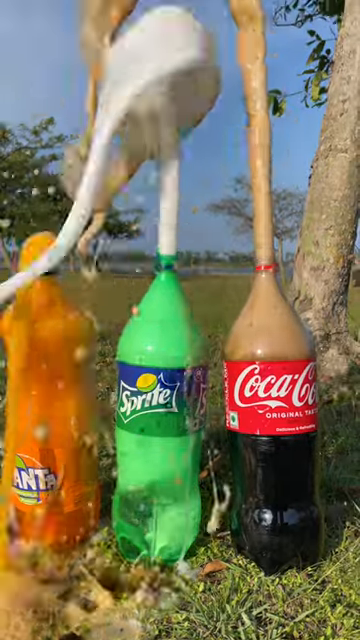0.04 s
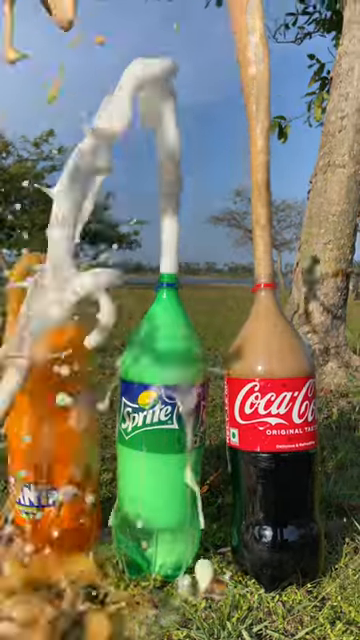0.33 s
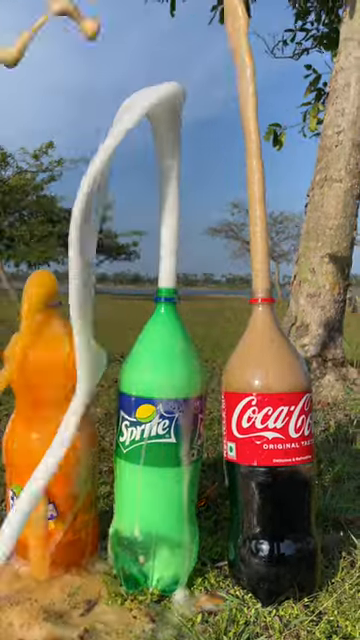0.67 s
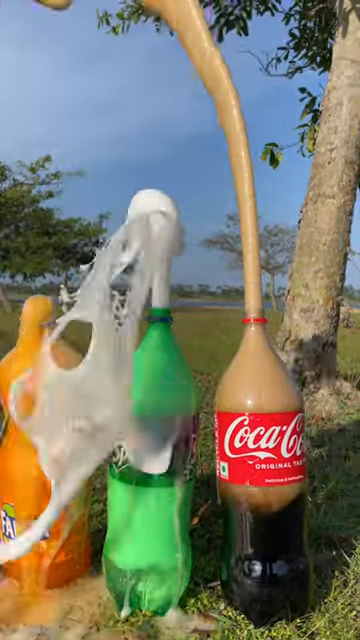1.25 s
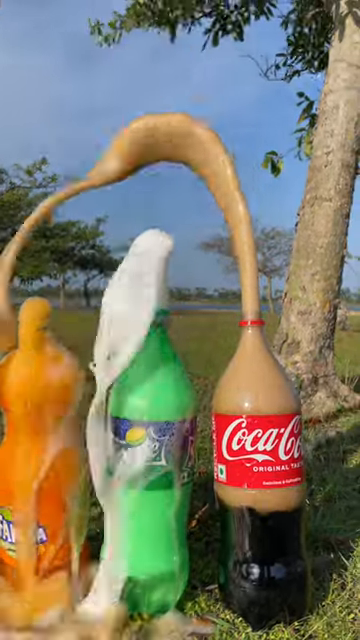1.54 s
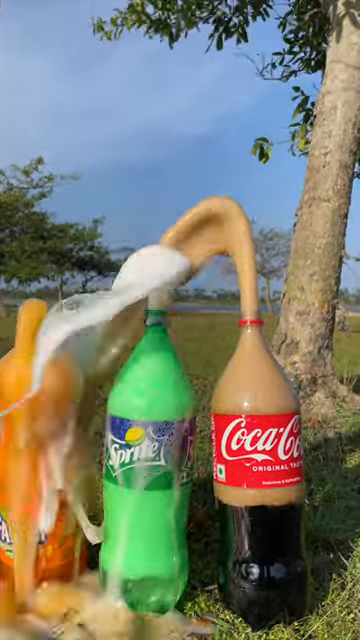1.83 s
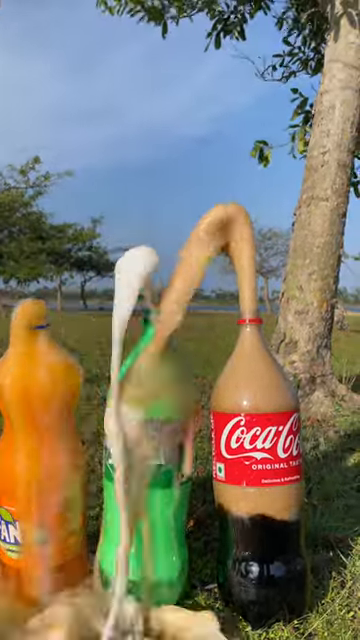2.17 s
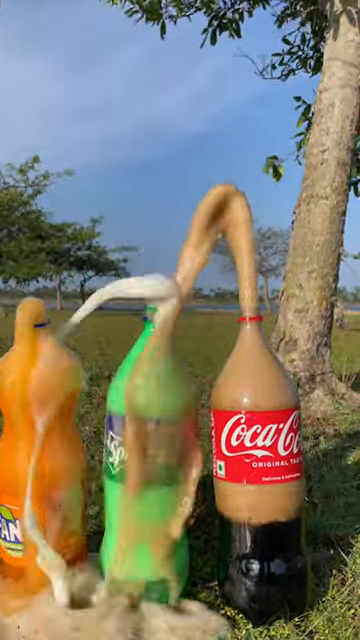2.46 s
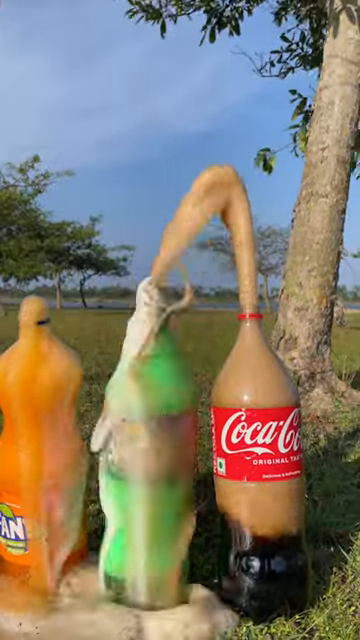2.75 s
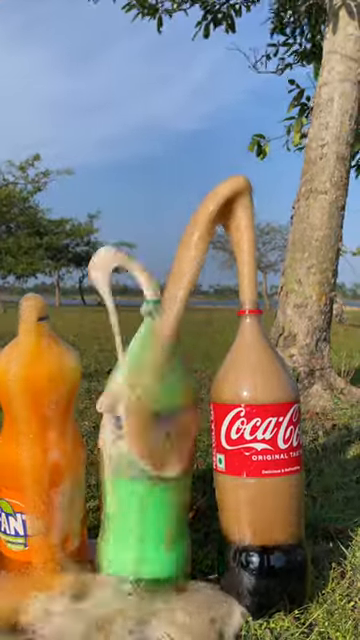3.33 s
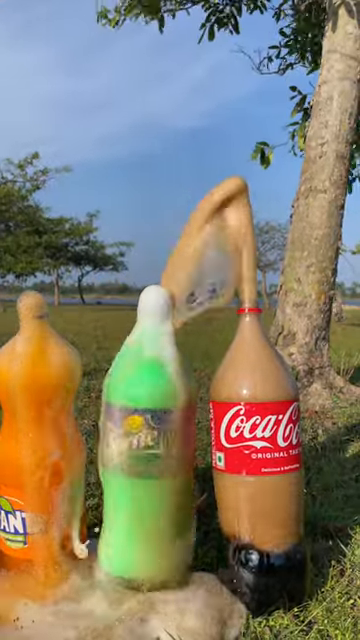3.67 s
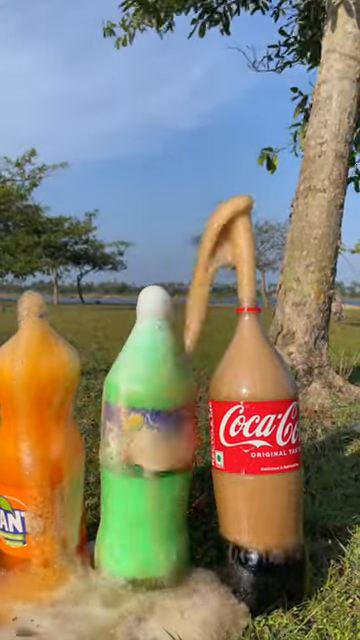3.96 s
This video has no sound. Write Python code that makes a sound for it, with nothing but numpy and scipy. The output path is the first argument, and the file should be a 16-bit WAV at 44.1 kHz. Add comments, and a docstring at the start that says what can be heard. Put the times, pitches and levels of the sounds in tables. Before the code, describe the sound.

Erupting soda foam slaps and spatters on a lawn, then drips and fizzes in a breeze.

```python
"""Foam from three erupting soda bottles slaps and spatters on a lawn, with a patter of spray.
After 1.7 s the jets sink: a neck hisses briefly, and foam drips, dribbles and fizzes in its puddle.
Heavy blobs thud throughout. A breeze rumbles and flutters on the close two-port microphone."""
import sys
import numpy as np
from scipy import signal
from scipy.fft import rfft, irfft
from scipy.io import wavfile
from scipy.ndimage import uniform_filter1d

SR = 44100
rng = np.random.default_rng(int(sys.argv[2]) if len(sys.argv) > 2 else 0)


def output_pcm(signal):
    """Save a mono or channel-first signal as 16-bit PCM at the path in sys.argv[1].

    Samples are clipped to [-1, 1] before scaling.
    """
    pcm = np.clip(np.atleast_2d(signal).T, -1, 1) * 32767
    wavfile.write(sys.argv[1], SR, np.round(pcm).astype(np.int16))


N = 176400

# Foam clots landing: peak_s, plop_db, slap_db, spatter_db (before SPLAT_GAIN_DB)
SPLAT_HITS = [(0.0561, -37.5, -48, -49), (0.086, -38.5, -45.5, -40.5), (0.13, -49, -46, -58),
              (0.304, -64, -55, -39.5), (0.425, -72, -50, -47.5), (0.482, -46.5, -47, -37.5),
              (0.4992, -68, -60, -41.5), (0.635, -60, -44.5, -42), (0.701, -54, -45.5, -44),
              (0.7227, -52, -44.5, -46), (0.742, -47, -46.5, -56), (0.8195, -40.5, -48.5, -45),
              (0.8503, -61, -48.5, -44), (0.8927, -50, -44, -40.5), (0.921, -39, -40, -61),
              (0.978, -69, -45, -49), (1.0182, -59, -40.5, -44.5), (1.082, -62, -44.5, -42),
              (1.139, -66, -40, -38.5), (1.172, -57, -47.5, -44), (1.2095, -57, -46, -48),
              (1.31, -47, -42, -39), (1.364, -46, -44, -41), (1.392, -55, -45, -42),
              (1.418, -42, -40, -35.5), (1.427, -42, -43, -37), (1.464, -47, -43.5, -37.5),
              (1.512, -44, -40, -50), (1.5225, -43, -41, -42), (1.573, -53, -46.5, -36.5),
              (1.581, -47, -43.5, -47), (1.657, -41.5, -44.5, -35), (1.7931, -56, -48, -58),
              (2.052, -53.5, -54, -48.5), (3.1846, -65, -52.5, -51)]
# Closing air pocket: freq_hz, density_db
PLOP_SPECTRUM = [(250, -28), (500, -3), (850, 2), (1350, 1.5), (2800, -25)]
# Wet slap: freq_hz, density_db
SLAP_SPECTRUM = [(800, -30), (1400, 1.5), (2100, 5.5), (2700, -0.5), (5000, -11.5)]
# Fine droplets: freq_hz, density_db
SPATTER_SPECTRUM = [(1900, -34), (3200, 5), (5700, 11.5), (12500, 5.5), (16000, 3)]
SPLAT_RISE_S = (.0022, .0028, .0011)  # plop, slap, spatter
SPLAT_GAIN_DB, SPLAT_TAIL_DB, SPLAT_TAIL_S = 4, -18, .008
DROPLETS_PER_S, DROPLET_SPREAD_DB = 6400, 3.5

def splats():
    """Each clot bursts into droplets: round plop, wet slap, sharp spatter, each with a soft tail."""
    power = np.zeros((3, N))
    t = np.arange(SR // 10) / SR
    tail_power = (amp(SPLAT_TAIL_DB) * swell(t / SPLAT_TAIL_S)) ** 2
    for peak_s, *levels_db in SPLAT_HITS:
        for part, level_db, rise_s in zip(power, levels_db, SPLAT_RISE_S):
            add(part, peak_s - rise_s, amp(level_db) ** 2 * (swell(t / rise_s) ** 2 + tail_power))
    out = np.zeros((2, N))
    for envelope, spectrum in zip(np.sqrt(power), (PLOP_SPECTRUM, SLAP_SPECTRUM, SPATTER_SPECTRUM)):
        out += colour(envelope * clicks(DROPLETS_PER_S, DROPLET_SPREAD_DB), spectrum)
    return amp(SPLAT_GAIN_DB) * out


# Heavy blobs landing: start_s, level_db, start_hz, rise_s
THUD_HITS = [(0.14, -30.5, 128, 0.013), (.225, -33, 326, 0.012), (0.386, -30, 88.5, 0.0091),
             (0.521, -35.5, 392, 0.0071), (0.78, -32.5, 335, 0.0072), (1.034, -31.5, 350, 0.0092),
             (1.423, -19.5, 576, 0.00436), (1.582, -29, 587, 0.0048), (1.828, -28, 173, 0.0072),
             (2.41, -29.5, 394, 0.0069), (2.577, -25, 595, 0.004), (2.64, -31, 400, 0.0034),
             (2.768, -37.5, 294.3, 0.0064), (2.923, -27, 410, 0.0041), (3.038, -28, 272, 0.0082),
             (3.403, -31.5, 194.4, 0.0067), (3.54, -22, 514, 0.0062), (3.663, -33, 448, 0.005),
             (3.95, -33.5, 322.7, 0.0055)]
# Smack opening a thud: freq_hz, density_db
SMACK_SPECTRUM = [(200, 11.5), (400, 10.5), (1300, -38.5)]
SMACK_DB, SMACK_REF_HZ, SMACK_RISE_S = -12.5, 400, 0.0021

def thuds():
    """A heavy blob lands: a rough smack and a round thump that sinks in pitch as it spreads."""
    thumps, smack_envelope = np.zeros((2, N))
    t = np.arange(SR // 10) / SR
    for start_s, level_db, start_hz, rise_s in THUD_HITS:
        add(thumps, start_s, amp(level_db) * thump(t, rise_s, start_hz, end_hz=94.8, glide_ratio=0.94))
        smack_gain = amp(level_db + SMACK_DB) * start_hz / SMACK_REF_HZ
        add(smack_envelope, start_s, smack_gain * swell(t / SMACK_RISE_S))
    noise = steadied(colour(rng.standard_normal(N), SMACK_SPECTRUM), window_s=0.0099)
    return thumps + smack_envelope * noise


# Drops raining from the jets: time_s, level_db
SPRAY_LEVELS = [(0, -48.5), (.06, -40), (.12, -51), (.28, -59.5), (.345, -39), (.39, -52), (.53, -43.5),
                (.56, -47.5), (.77, -47), (.87, -57.5), (1.06, -51.5), (1.12, -43), (1.23, -47.5),
                (1.29, -38.5), (1.34, -49.5), (1.69, -47.5), (1.76, -56), (2.1, -57), (4, -62.5)]
# Drop crackle: freq_hz, density_db
SPRAY_SPECTRUM = [(400, -30), (750, -16), (1200, 1), (3100, -4.5), (16000, -8.5)]
SPRAY_DECAY_S = 0.0064

def spray():
    """Small drops patter down, each a few milliseconds of crackle."""
    t = np.arange(SR // 20) / SR
    drops = clicks(per_s=320, spread_db=-0.5)[0] ** 2
    power = abs(signal.oaconvolve(drops, np.exp(-2 * t / SPRAY_DECAY_S))[:N])
    envelope = steadied(np.sqrt(power), window_s=0.053) * amp(curve(SPRAY_LEVELS))
    return colour(envelope * clicks(DROPLETS_PER_S, DROPLET_SPREAD_DB), SPRAY_SPECTRUM)


# Fat single drops: start_s, level_db
DRIP_HITS = [(2.019, -45), (2.113, -38.5), (2.2851, -32), (2.3295, -39.5), (2.378, -37), (2.974, -38),
             (3.017, -44), (3.47, -42)]
TICK_DB, TICK_RISE_S = -14, .0005

def drips():
    """A fat drop hits the puddle: a crisp tick, then a very short falling pop."""
    out = np.zeros(N)
    t = np.arange(SR // 20) / SR
    pop = thump(t, rise_s=0.0014, start_hz=1140, end_hz=245, glide_ratio=1.18)
    for start_s, level_db in DRIP_HITS:
        tick = amp(TICK_DB) * swell(t / TICK_RISE_S) * rng.standard_normal(len(t))
        add(out, start_s, amp(level_db) * (tick + pop))
    return out


# Bursting bubbles: time_s, level_db
FIZZ_LEVELS = [(0, -50), (1.6, -51.5), (2.8, -55), (4, -54.5)]
# Bubble bursts: freq_hz, density_db
FIZZ_SPECTRUM = [(350, -27), (750, 2.5), (2100, 4), (16000, 2.5)]

def fizz():
    """Countless tiny bubbles burst in the foam."""
    return colour(clicks(per_s=14000, spread_db=2), FIZZ_SPECTRUM) * amp(curve(FIZZ_LEVELS))


# Gas hiss: freq_hz, density_db
SQUIRT_SPECTRUM = [(2000, -12), (4800, 5), (5450, 2.5), (6200, -15)]

def squirt(start_s=1.821, length_s=0.16, level_db=-50.5):
    """Gas hisses through a bottle neck, swells and stops."""
    progress = np.clip((np.arange(N) / SR - start_s) / length_s, 0, 1)
    hiss = colour(rng.standard_normal((2, N)), SQUIRT_SPECTRUM)
    return hiss * amp(level_db) * np.sin(np.pi * progress ** 0.95)


# Foam running into the puddle: time_s, level_db
DRIBBLE_LEVELS = [(1, -81), (1.4, -58.5), (2.2, -62), (3.8, -64.5)]
BUBBLE_RANGE_HZ, BUBBLES_PER_S, BUBBLE_DECAY_CYCLES, BUBBLE_PITCH_RISE = (650, 2400), 870, 1.5, 0.04

def dribble(sizes=24):
    """Bubbles of many sizes ring in the puddle for a few cycles, rising in pitch."""
    out = np.zeros((2, N))
    for pitch_hz in np.geomspace(*BUBBLE_RANGE_HZ, sizes):
        cycles = pitch_hz * np.arange(SR // 25) / SR
        age = cycles / BUBBLE_DECAY_CYCLES
        ring = np.exp(-age) * np.sin(2 * np.pi * cycles * (1 + BUBBLE_PITCH_RISE * age / 2))
        onsets = clicks(BUBBLES_PER_S / sizes, spread_db=1.5)
        out += signal.oaconvolve(onsets, ring[None])[:, :N]
    return unit(out) * amp(curve(DRIBBLE_LEVELS))


# Gusts on the microphone: start_s, length_s, rumble_db, flutter_db
WIND_GUSTS = [(0, 0.14, -39.5, -51), (0.221, 0.044, -27.5, -35), (0.288, 0.11, -34, -38),
              (0.464, 0.12, -40, -44), (0.675, 0.29, -43.5, -55), (0.946, 0.13, -34.5, -48),
              (1.134, 0.082, -38, -42), (1.234, 0.085, -32, -39), (1.384, 0.089, -30, -35),
              (1.49, 0.24, -35, -43), (1.775, 0.11, -34, -44), (1.868, 0.21, -39.5, -44),
              (2.077, 0.16, -47.5, -55), (2.404, 0.155, -39.5, -45), (2.615, 0.063, -35.5, -44),
              (2.932, 0.12, -38, -43.5), (3.152, 0.11, -36.5, -47), (3.317, 0.11, -42, -50.5),
              (3.58, 0.18, -40, -51), (3.9, 0.09, -41.5, -54.5)]
# Large eddies: freq_hz, density_db
RUMBLE_SPECTRUM = [(20, -46), (48, 3.5), (70, 4), (120, -1.5), (190, -7), (260, -14.5), (450, -112)]
# Small eddies, channels in phase: freq_hz, density_db
FLUTTER_SPECTRUM = [(130, -24), (220, 3), (310, 0), (630, -9), (1400, -43)]
# Smallest eddies, channels in antiphase: freq_hz, density_db
ANTIPHASE_SPECTRUM = [(130, -28), (260, -1), (1400, -13)]
# Wind power in antiphase: time_s, rumble_share, flutter_share
ANTIPHASE_SHARES = [(0, 0.44, 0.73), (.27, 0.91, 1.002), (.7, 0.01, 0.88), (1.02, 0, 0.7), (1.25, 0, 0)]
GUST_EDGE_S, LULL_RUMBLE_DB, LULL_FLUTTER_DB = 0.029, -46.5, -58

def wind():
    """Large eddies rumble, small ones flutter; early on they partly drive the channels in antiphase."""
    power = np.zeros((2, N))
    for start_s, length_s, *levels_db in WIND_GUSTS:
        add(power, start_s, amp(levels_db)[:, None] ** 2 * np.ones(int(length_s * SR)))
    power = abs(uniform_filter1d(power, int(GUST_EDGE_S * SR)))
    power += amp([[LULL_RUMBLE_DB], [LULL_FLUTTER_DB]]) ** 2
    rumble = steadied(colour(clicks(per_s=140, spread_db=1), RUMBLE_SPECTRUM), window_s=0.0707)
    flutter = [steadied(colour(eddies, spectrum), window_s=.08)
               for eddies, spectrum in zip(small_eddies(), (FLUTTER_SPECTRUM, ANTIPHASE_SPECTRUM))]
    out = np.zeros((2, N))
    for k, (common, opposed) in enumerate((rumble, flutter)):
        share = np.clip(curve(ANTIPHASE_SHARES, column=k + 1), 0, 1)
        pair = np.sqrt(1 - share) * common + np.sqrt(share) * opposed * [[1], [-1]]
        out += np.sqrt(power[k]) * pair
    return out


def small_eddies(sizes=14, per_s=260, range_hz=(177, 733), width_cycles=0.97):
    """Each small eddy is one rounded pressure wobble with its own pitch."""
    out = np.zeros((2, N))
    t = np.arange(-SR // 50, SR // 50) / SR
    for pitch_hz in np.geomspace(*range_hz, sizes):
        wobble = unit(np.exp(-(pitch_hz * t / width_cycles) ** 2) * np.sin(2 * np.pi * pitch_hz * t))
        arrivals = clicks(per_s / sizes, spread_db=1)
        out += signal.oaconvolve(arrivals, wobble[None] * np.sqrt(pitch_hz), "same")
    return out


# Treble ripple, both channels: freq_hz, gain_db
TREBLE_RESPONSE = [(3200, 0.5), (4200, -1.5), (5600, 4), (7400, -5.5), (9500, -0.5), (12500, -4)]
# Left-right likeness: freq_hz, coherence
STEREO_COHERENCE = [(500, .9), (1200, .3), (2000, .8), (3900, .1), (5000, .86), (14000, .92)]
# Right-channel phase shift: freq_hz, lag_rad
WIDENING_PHASE = [(5100, 0), (7600, 3.14), (11000, 6.28), (14400, 9.42), (16000, 10.3)]

def widen(pair):
    """Stereo widening: the right channel is partly like the left and shifted in phase in the treble."""
    left, independent = rfft(pair) * amp(over_hz(TREBLE_RESPONSE))
    coherence = np.clip(over_hz(STEREO_COHERENCE), -1, 1)
    right = coherence * left + np.sqrt(1 - coherence ** 2) * independent
    right *= np.exp(-1j * over_hz(WIDENING_PHASE))
    return irfft(np.array([left, right]), N)


def thump(t, rise_s, start_hz, end_hz, glide_ratio):
    """A few cycles that swell and die while their pitch falls."""
    pitch_hz = end_hz + (start_hz - end_hz) * np.exp(-t / (glide_ratio * rise_s))
    return swell(t / rise_s) * np.sin(2 * np.pi * np.cumsum(pitch_hz) / SR)


def clicks(per_s, spread_db):
    """Two channels of random clicks, varied in sign and size, at rms 1."""
    shape = (2, N)
    size = amp(spread_db * np.minimum(rng.exponential(1, shape), 4))
    return unit(size * rng.choice([-1, 1], shape) * (rng.random(shape) < per_s / SR))


def swell(u):
    """Quick rise to 1 at u = 1, then exponential fall."""
    return u * np.exp(1 - u)


def steadied(x, window_s):
    """Removes level drift slower than the window."""
    power = abs(uniform_filter1d(x ** 2, int(window_s * SR)))
    return x / np.sqrt(power + 1e-4 * np.mean(x ** 2))


def colour(x, spectrum):
    """Filters by a spectrum, keeping the power of white noise."""
    return irfft(rfft(x) * unit(amp(over_hz(spectrum))), N)


def over_hz(rows):
    """Frequency table, interpolated per FFT bin."""
    freq_hz, value = np.transpose(rows)
    return np.interp(np.log(np.fft.rfftfreq(N, 1 / SR) + 1), np.log(freq_hz), value)


def curve(rows, column=1):
    """Time table column, interpolated per sample."""
    rows = np.array(rows)
    return np.interp(np.arange(N) / SR, rows[:, 0], rows[:, column])


def add(mix, start_s, sound):
    """Mixes a sound in, in place."""
    part = mix[..., max(round(start_s * SR), 0):][..., :sound.shape[-1]]
    part += sound[..., :part.shape[-1]]


def amp(db):
    """Decibels to gain."""
    return 10 ** (np.asarray(db) / 20)


def unit(x):
    """Scales to rms 1."""
    return x / np.sqrt(np.mean(x ** 2) + 1e-20)


def scene():
    """Foam on the lawn, wind on the microphone."""
    return widen(splats() + spray() + fizz() + dribble() + squirt()) + thuds() + drips() + wind()


def record(dry, cutoff_hz=15900):
    """Steep low-pass band limit."""
    lowpass = signal.firwin(511, cutoff_hz, window=("kaiser", 9), fs=SR)
    return signal.oaconvolve(dry, lowpass[None], "same")


dry = scene()
out = record(dry)
output_pcm(out)
```